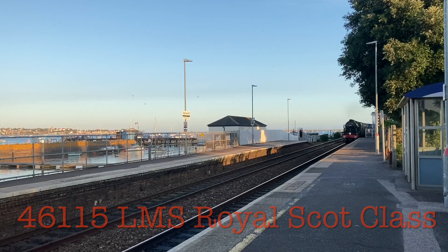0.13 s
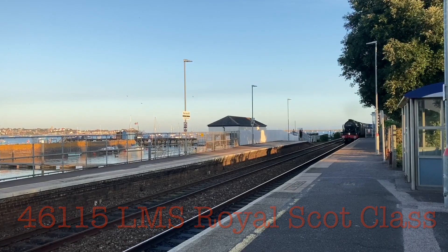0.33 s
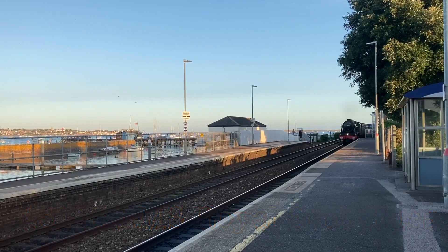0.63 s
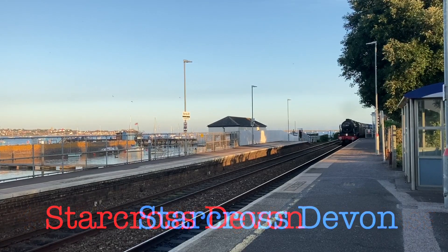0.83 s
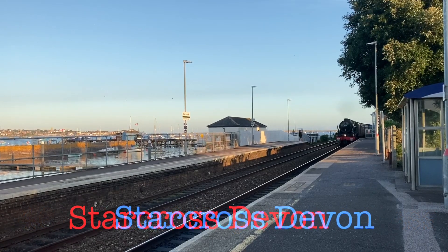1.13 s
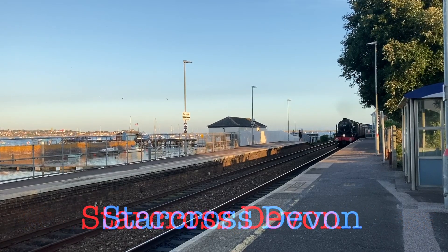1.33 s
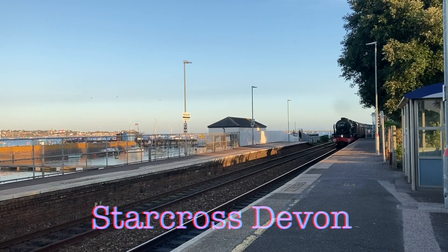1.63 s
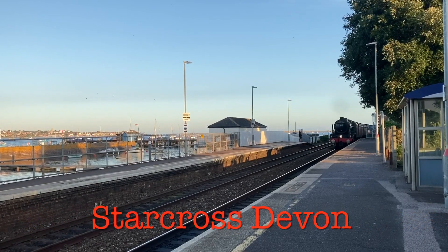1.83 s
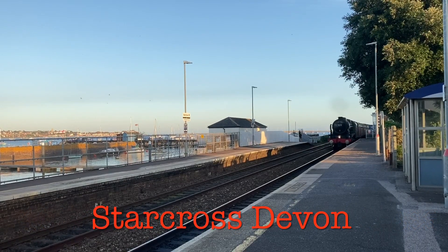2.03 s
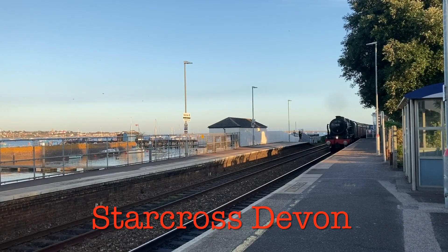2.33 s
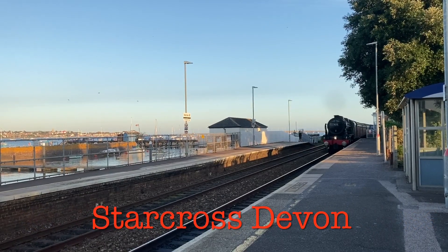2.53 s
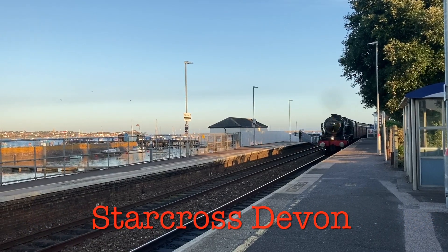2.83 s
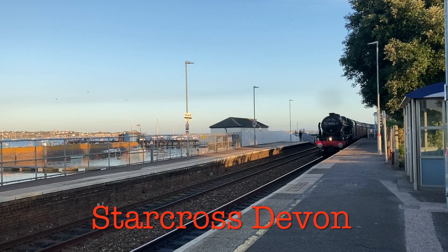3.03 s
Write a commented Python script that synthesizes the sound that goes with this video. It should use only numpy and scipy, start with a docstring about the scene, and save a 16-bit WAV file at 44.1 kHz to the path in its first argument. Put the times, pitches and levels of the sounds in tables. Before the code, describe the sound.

A steam engine draws nearer outdoors: breathy low roar, steady thin hiss and rhythmic bright steam blows that strengthen, a deep throb beneath, dull metallic knocks later, picked up in stereo from the platform.

```python
"""A low exhaust roar and a bright blow of leaking steam open the scene: a steam locomotive draws nearer along
an open platform. Turbulent noise coloured by chimney and boiler makes the roar, swayed by six uneven beats a
wheel turn. Once a turn a leaking cylinder blows a noise jet, more faintly on some return strokes. A narrow
deep rumble, a steady hiss, thin spurts of steam and decaying modes of metal knocks lie around it, and a close
pair of microphones hears the noises with a likeness and phase that depend on frequency."""
import sys
import numpy as np
from scipy import signal
from scipy.fft import rfft, irfft, next_fast_len
from scipy.io import wavfile
from scipy.ndimage import uniform_filter1d

SR = 44100
rng = np.random.default_rng(int(sys.argv[2]) if len(sys.argv) > 2 else 0)


def output_pcm(signal):
    """Save a mono or channel-first signal as 16-bit PCM at the path in sys.argv[1].

    Samples are clipped to [-1, 1] before scaling.
    """
    pcm = np.clip(np.atleast_2d(signal).T, -1, 1) * 32767
    wavfile.write(sys.argv[1], SR, np.round(pcm).astype(np.int16))


def boost(x):
    """Linear amplitude factor 10**(x/20) for a level x in decibels (scalar or array-like)."""
    u = np.asarray(x, float) / 20
    return 10 ** u


N = 140238


def rms_one(x):
    """Energy normalisation: scales the root mean square to 1."""
    return x / np.sqrt(np.mean(x ** 2) + 1e-20)


def along(rows, at):
    """Linear interpolation: every later column of a table, read at places along its first column."""
    first, *columns = np.transpose(rows)
    return [np.interp(at, first, c) for c in columns]


def colour(rows, hz):
    """Spectral envelope: gain from an (f/Hz, level/dB) table, interpolated over log frequency."""
    table_hz, table_db = np.transpose(rows)
    return boost(np.interp(np.log(hz), np.log(table_hz), table_db))


def resonance(hz, centre_hz, width_hz):
    """Double resonance: the squared magnitude of a damped oscillator's response, 1 at its centre."""
    return 1 / (1 + ((hz - centre_hz ** 2 / hz) / width_hz) ** 2)


def drift(rate_hz):
    """Low-passed chance: white noise through a double real pole gives a slow wander of rms 1."""
    step = 40  # samples between computed points
    pole = np.exp(-2 * np.pi * rate_hz * step / SR)
    settle = 2000  # points discarded while the filter settles
    white = rng.standard_normal(N // step + 2 + settle)
    slow = signal.lfilter([1], [1, -2 * pole, pole * pole], white)[settle:]
    return np.interp(np.arange(N) / step, np.arange(len(slow)), rms_one(slow - slow.mean()))


def pair_noise(shape, patchy_db=0., rate_hz=8.):
    """Partial coherence: two noises mixed by likeness and phase; half-octave bands flicker singly; rms 1."""
    # microphone pair: f/Hz, likeness (0-1, before its cap), extra phase lead of right/rad, left over right/dB
    spacing = [(20, .99, -0.04, 0.1), (99, 1, -0.42, -0.3), (164, .96, -0.8, 0.4), (310, .62, -0.8, 1.5),
               (500, 0.34, -0.8, 2.4), (836, 0.4, -1.0, 2.5), (1200, 0.57, -2.5, 1), (1454, 1, -6.5, 3.0),
               (1566, 0, -5.5, 7.5), (1730, 0.8, -6, 4), (2050, 0.1, -4, 3), (2280, 0.6, -4.5, -1),
               (2990, 0.7, -5.5, 1.5), (3070, 0, -3.6, 3.5), (3310, 0.5, -4, -1), (3450, 1, -3.5, 0),
               (6200, 1, -3, .1), (9500, 1, -3.14, 0)]
    left_lag_s = 1 / 2260
    size = next_fast_len(N)
    hz = np.arange(size // 2 + 1) * SR / size + 1e-3  # kept above zero for the logarithms
    alike, lead, pan_db = along(spacing, hz)
    alike = np.clip(alike, 0, np.where(hz > 300, .94, 1))
    one, other = rfft(rng.standard_normal((2, size)))
    phase = lead + 2 * np.pi * hz * left_lag_s
    right = alike * one * np.exp(1j * phase) + np.sqrt(1 - alike ** 2) * other
    both = np.array([one * boost(pan_db / 2), right * boost(-pan_db / 2)]) * shape(hz)
    # overlapping triangular bands whose gains add up to 1
    place = 2 * np.log2(np.clip(hz, 40, 10240) / 40)
    out = 0
    for k in range(17):
        band = irfft(both * np.clip(1 - abs(place - k), 0, 1), size)[:, :N]
        out = out + band * boost(patchy_db * drift(rate_hz))
    return rms_one(out)


def hiss(t):
    """Stationary filtered noise: steam hiss of fixed spectral envelope that wavers a little."""
    # course of the hiss: t/s, level/dB
    course = [(0, -31.5), (.5, -33.5), (.9, -35.5), (1.4, -33), (1.9, -33.5), (2.4, -33), (3.18, -32)]
    # hiss as heard, with a narrow dip near 8.9 kHz: f/Hz, relative level per Hz/dB
    heard = [(2200, -19.5), (3200, -6), (3800, -2.5), (5500, -0.5), (7000, -6), (8600, -5.5), (8880, -19.5),
             (9250, 1), (9700, -8.5)]
    level_db, = along(course, t)
    return boost(level_db) * pair_noise(lambda hz: colour(heard, hz), patchy_db=.7, rate_hz=3.0)


def rumble(t):
    """Narrow-band noise: a resonance makes a deep throb, whose random slow swing is partly evened out."""
    # course of the rumble: t/s, level/dB
    course = [(0, -18), (.5, -18.5), (.9, -18), (1.4, -18), (1.9, -19), (2.25, -16), (2.5, -20), (2.8, -13),
              (3.18, -16)]
    centre_hz, width_hz = 24.6, 15.5
    evening = .2  # share of the slow swing taken out
    level_db, = along(course, t)
    throb = pair_noise(lambda hz: resonance(hz, centre_hz, width_hz))
    power = np.mean(throb ** 2, 0)
    slow_power = uniform_filter1d(uniform_filter1d(power, size=SR // 6), size=SR // 6)
    return boost(level_db) * rms_one(throb / slow_power ** (evening / 2))


def knocks(t):
    """Modal synthesis: dull metal knocks in the running gear, decaying sines of scattered strength."""
    # knocks: t/s, level before side gains and scatter/dB
    strikes = [(.025, -29), (1.865, -21), (2.355, -15)]
    # modes of the metal: f/Hz, relative level before scatter/dB, 60 dB decay time/s
    modes = [(1040, 0, .06), (1196, -3, .05), (760, -6, 0.058), (1690, -11, 0.029)]
    out = np.zeros(N)
    luck_db = rng.normal(0, 2, (len(strikes), len(modes)))
    for (start, db), row in zip(strikes, luck_db):
        age = np.clip(t - start, 0, None)
        onset = 1 - np.exp(-age / .002)
        for (hz, mode_db, t60), extra_db in zip(modes, row):
            decay = boost(db + mode_db + extra_db - 60 * age / t60)
            out += decay * onset * np.sin(2 * np.pi * hz * age)
    return out * boost(np.array([[-4.0], [-7.0]]))  # a little louder on the left


def spurts(t):
    """Gated noise: Gaussian envelopes make brief bright wisps of steam swell and fade."""
    # spurts: t of peak/s, length/s, level/dB
    wisps = [(0.373, .03, -37), (1.41, 0.011, -41), (1.655, 0.035, -35.5), (2.857, .03, -44)]
    # spurts as heard, with a narrow dip near 8.9 kHz: f/Hz, relative level per Hz/dB
    heard = [(3000, -25), (5000, -6.5), (6500, -0.5), (8500, -1.5), (8900, -8), (9400, -1)]
    envelope = sum(boost(db) * np.exp(-((t - peak) / length) ** 2) for peak, length, db in wisps)
    return envelope * pair_noise(lambda hz: colour(heard, hz))


def leak(t):
    """Pulsed jet noise: each blow rises, holds and dies; its treble is briefer; a faint whistle wanders."""
    # one strong blow per wheel turn, with some fainter or shorter ones between:
    # t of start/s, rise/s, hold/s, level/dB, brightness/dB (added to treble, taken off the rest)
    blows = [(0.024, 0.092, 0.048, -29.5, -3), (0.33, 0.033, .03, -36.5, -1),
             (0.552, .03, 0.096, -27, -0.7), (1.031, 0.048, 0.095, -27, -1.5),
             (1.392, 0.0072, .006, -30.5, -1.5), (1.533, .04, 0.12, -25, -2),
             (2.036, .02, .10, -26.5, -5.2), (2.513, 0.058, 0.085, -23.5, -3),
             (2.788, 0.035, .03, -33, 0.1), (3.01, 0.056, 0.082, -22, -2)]
    # leak as heard, with a narrow dip near 8.9 kHz: f/Hz, relative level per Hz/dB
    heard = [(1000, -17), (1700, -13), (3000, -10), (3500, -6), (3850, 1), (4200, -4.5), (5500, -6.5),
             (7000, -13.5), (8600, -18.5), (8900, -33), (9250, -18.5)]
    # whistle of the leak: t/s, level before its wander/dB
    whistle_course = [(0, -39.5), (.15, -39), (.3, -48), (.45, -46), (.6, -49.5), (1.0, -52), (1.4, -51.5),
                      (1.55, -42), (1.8, -59), (2.1, -43), (2.4, -48), (2.8, -49.5), (3.1, -43)]
    whistle_hz, whistle_width_hz = 3690, 250
    release_s = 0.06
    swell_db = 2.5  # a blow is weaker by this much at the ends of its hold
    treble_narrowing = 1.3  # exponent: the top of the jet sounds only near full pressure
    flutter_db = .6

    dull, bright = np.zeros(N), np.zeros(N)
    for start, attack, hold, db, bright_db in blows:
        held = t - start - attack
        rise = np.sin(np.clip((t - start) / attack, 0, 1) * np.pi / 2) ** 2
        fall = np.exp(-(np.clip(held - hold, 0, None) / release_s) ** 1.2)
        swell = boost(-swell_db * np.clip(2 * held / hold - 1, -1, 1) ** 2)
        pressure = rise * fall * swell
        dull = dull + boost(db - bright_db) * pressure
        bright = bright + boost(db + bright_db) * pressure ** treble_narrowing

    jet = pair_noise(lambda hz: colour(heard, hz), patchy_db=.6, rate_hz=30.0)
    treble = signal.sosfiltfilt(signal.butter(1, 5200, "high", fs=SR, output="sos"), jet)
    whistle_db, = along(whistle_course, t)
    whistle = pair_noise(lambda hz: resonance(hz, whistle_hz, whistle_width_hz))
    flutter = boost(flutter_db * drift(30.0))
    blowing = flutter * (dull * (jet - treble) + bright * treble)
    return blowing + boost(whistle_db + 1.2 * drift(20.0)) * whistle


def body(hz):
    """Source and resonator: the broad roar spectrum with chimney and boiler resonances standing out."""
    # exhaust and running roar: f/Hz, relative level per Hz/dB
    spectrum = [(12, -25), (36, -12), (50, -8.5), (62, -9.5), (90, -6), (118, 1.5), (160, -6.5),
                (210, -13.5), (320, -14), (450, -21), (650, -25.5), (800, -27.5), (1050, -28), (1500, -34),
                (2500, -37), (3300, -40.5), (5000, -49.5)]
    # resonances of chimney and boiler: f/Hz, width/Hz, height/dB
    peaks = [(232.6, 26, 3.5), (323, 49, 3), (494, 45, 6), (764, 31, 6.5), (1039, 74, 5), (1383, 65, 6),
             (1550, 33, 2.5), (1987, 45, 5)]
    peak_db = sum(db * resonance(hz, centre_hz, width_hz) for centre_hz, width_hz, db in peaks)
    return colour(spectrum, hz) * boost(peak_db)


def roar(t):
    """Amplitude-modulated turbulence: six uneven beats a wheel turn sway it, and its lows swell briefly."""
    # nearness of the engine: t/s, low roar level before swells and beats/dB, extra level of upper roar/dB
    approach = [(0, -21.5, -1), (.5, -21, -0.5), (1.0, -18, -0.8), (1.4, -17.5, -0.6), (1.8, -18, 1.2),
                (2.2, -16, -0.4), (2.6, -14.5, -0.3), (3.18, -15.5, 1)]
    # brief swells, and one slight dip, of the low exhaust roar: t of middle/s, length/s, extra level/dB
    swells = [(0.554, 0.033, 5), (.76, 0.03, 2), (1.01, 0.01, 6.5), (1.393, 0.016, 3.5), (1.545, 0.034, 2),
              (1.698, 0.025, 1), (1.88, .02, 2), (2.076, 0.047, 5), (2.155, 0.024, 2), (2.351, 0.013, 4.5),
              (2.545, 0.036, 1), (2.683, 0.019, -0.5), (2.806, .04, 3), (3.037, 0.019, 1.5)]
    turn_s, first_beat_s = .4955, 0.068
    beat_scatter_db = 1.5  # the depth wanders about zero, so a beat may swell or dip

    beat_phase = 2 * np.pi * (t - first_beat_s) * 6 / turn_s
    beat_db = beat_scatter_db * drift(5.2) * np.cos(beat_phase)
    level_db, upper_db = along(approach, t)
    swell_db = sum(db * np.exp(-((t - middle) / length) ** 2) for middle, length, db in swells)
    noise = pair_noise(body, patchy_db=.8, rate_hz=3.0)
    low = signal.sosfiltfilt(signal.butter(1, 300, fs=SR, output="sos"), noise)
    upper = noise - low
    return boost(level_db) * (boost(swell_db + beat_db) * low + boost(upper_db + 0.37 * beat_db) * upper)


def scene():
    """Linear superposition: the pressures of all sources add at the two microphones."""
    t = np.arange(N) / SR
    return hiss(t) + rumble(t) + knocks(t) + spurts(t) + leak(t) + roar(t)


def band_limit(x):
    """A steep low-pass at the top of the band."""
    return signal.sosfilt(signal.butter(12, 9970, fs=SR, output="sos"), x)


def record(dry):
    """Saturation and band-stop filtering: peaks are rounded, bands of sum and difference emptied, the top cut."""
    # silent bands in the sum of the sides: f/Hz, width/Hz
    sum_gaps = [(4570, 190), (6790, 300), (9020, 380)]
    # silent bands in the difference of the sides: f/Hz, width/Hz
    difference_gaps = [(5670, 300), (7900, 500)]
    limit, cutoff_hz = 1.1, 9730
    dry = limit * np.tanh(dry / limit)
    size = next_fast_len(N)
    hz = np.arange(size // 2 + 1) * SR / size
    top = np.clip((cutoff_hz - hz) / 80 + .5, 0, 1) ** 2

    def carve(x, gaps):
        """Band-stop filtering: opens the gaps with sloping edges and cuts the top."""
        passed = [np.clip((abs(hz - centre) - width / 2) / 60 + .5, 0, 1) for centre, width in gaps]
        return irfft(rfft(x, size) * np.prod(passed, axis=0) * top, size)[:N]

    mid = carve(dry[0] + dry[1], sum_gaps) / 2
    side = carve(dry[0] - dry[1], difference_gaps) / 2
    return band_limit(np.array([mid + side, mid - side]))


dry = scene()
out = record(dry)
output_pcm(out)
```